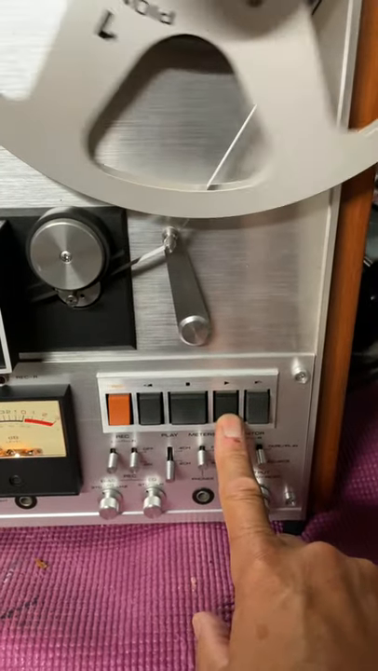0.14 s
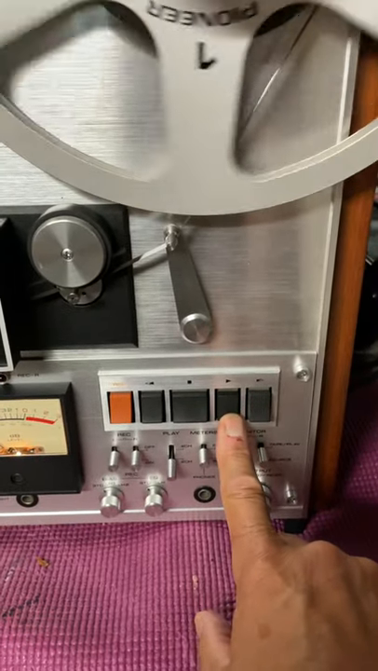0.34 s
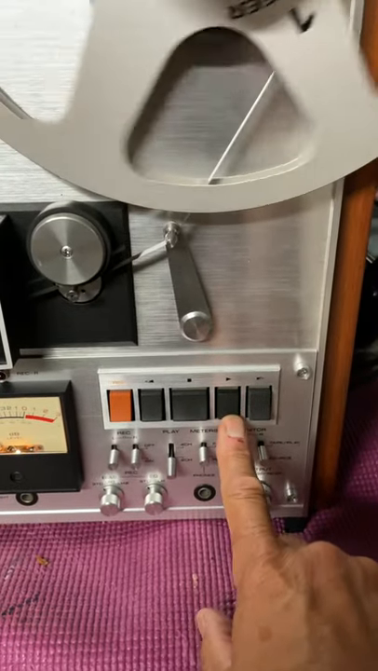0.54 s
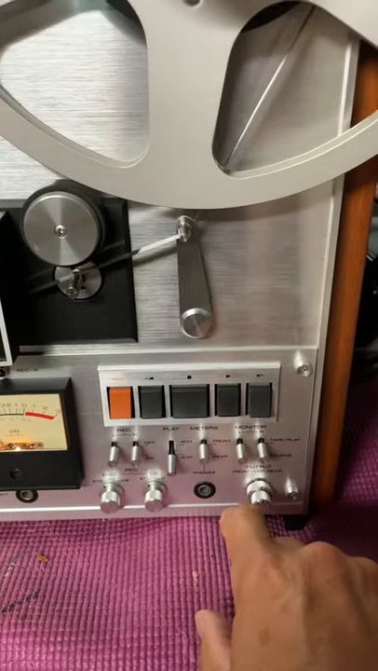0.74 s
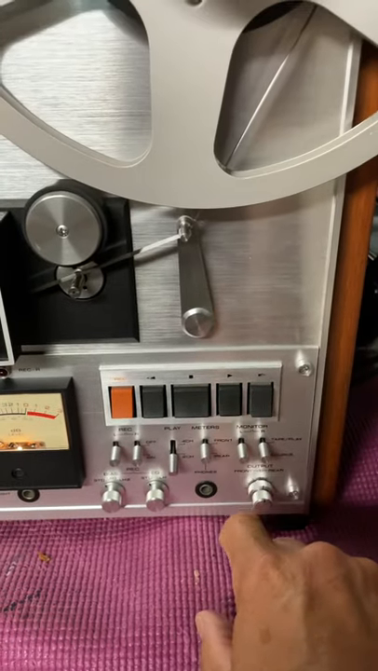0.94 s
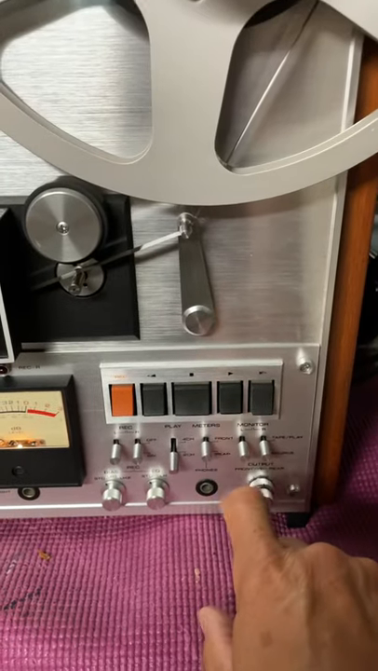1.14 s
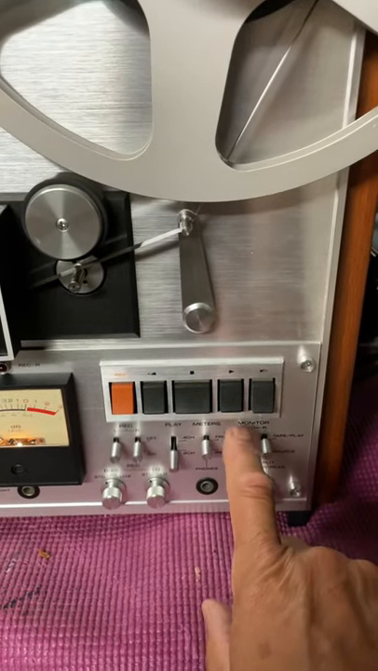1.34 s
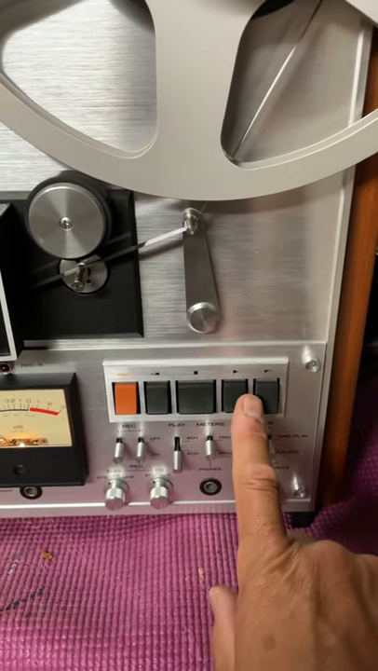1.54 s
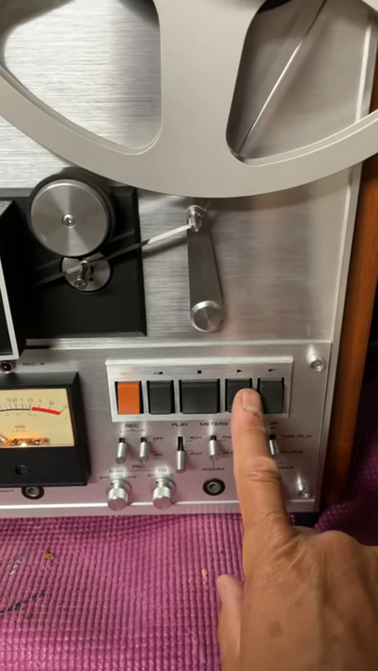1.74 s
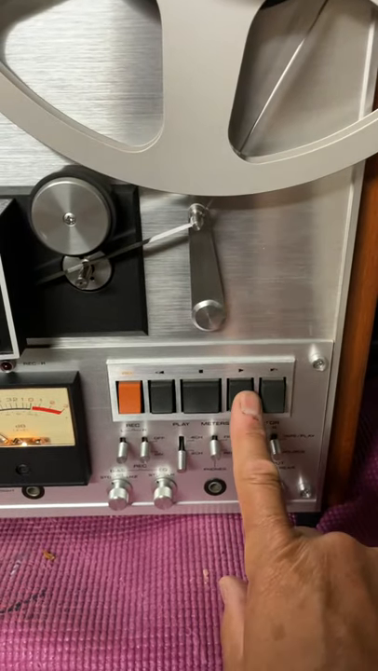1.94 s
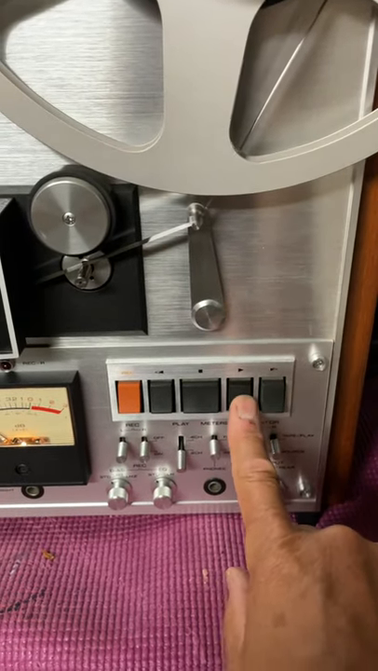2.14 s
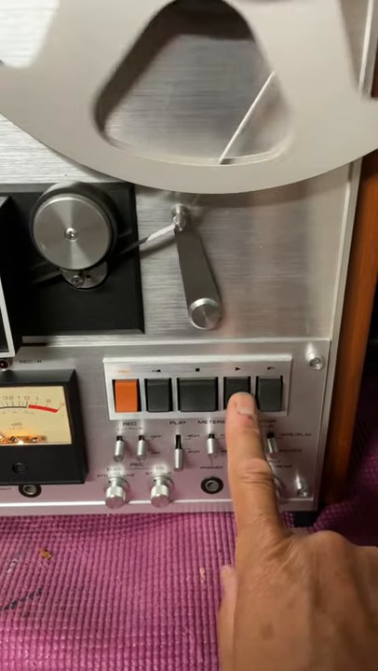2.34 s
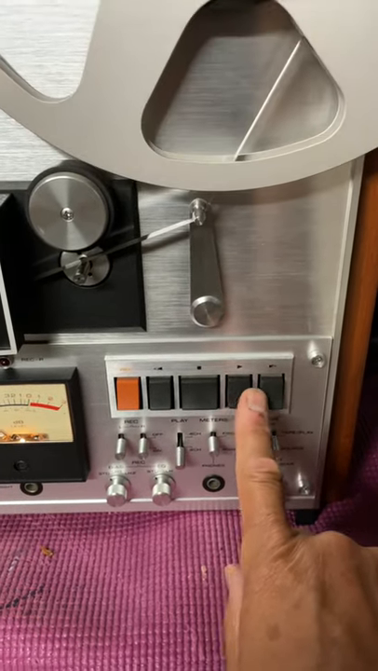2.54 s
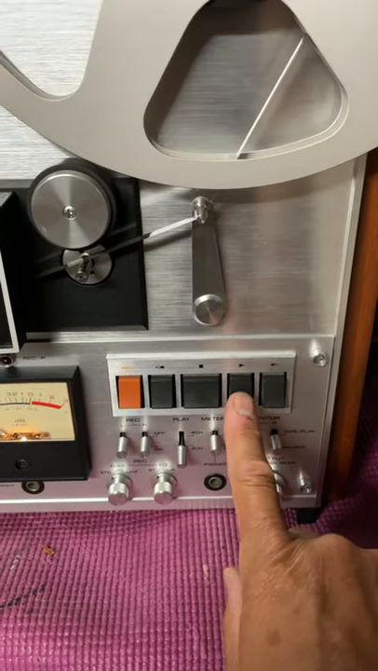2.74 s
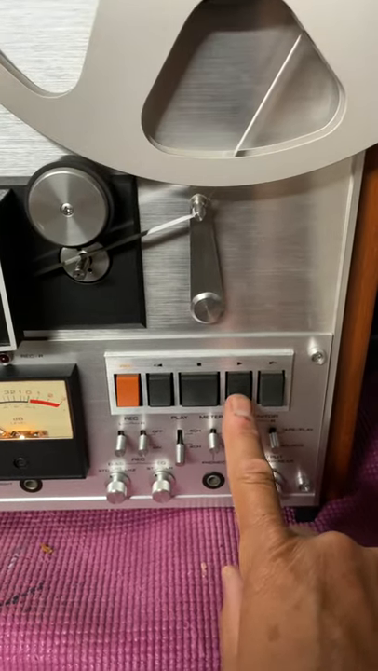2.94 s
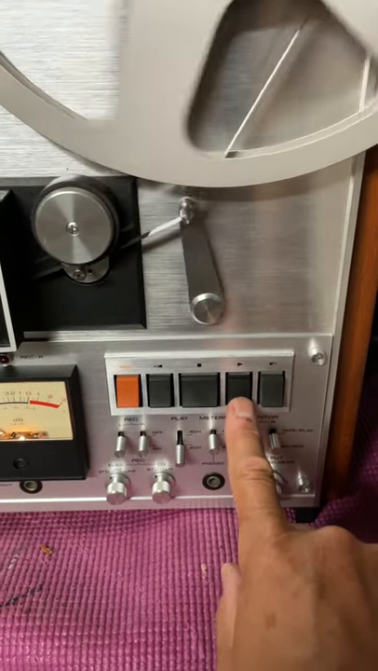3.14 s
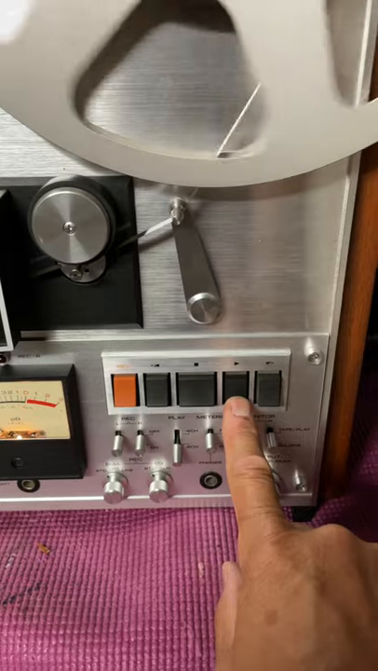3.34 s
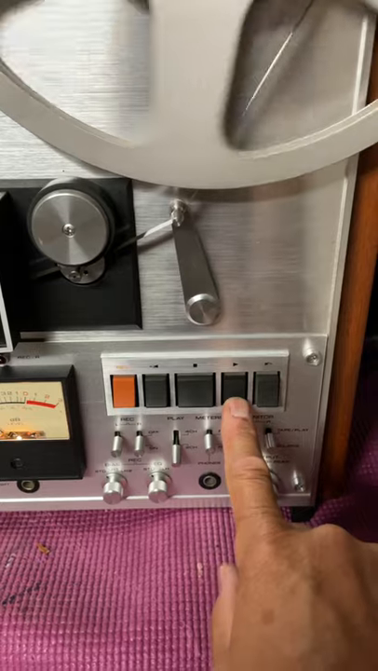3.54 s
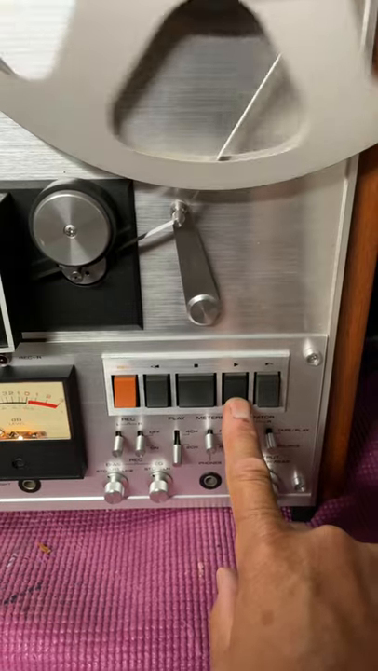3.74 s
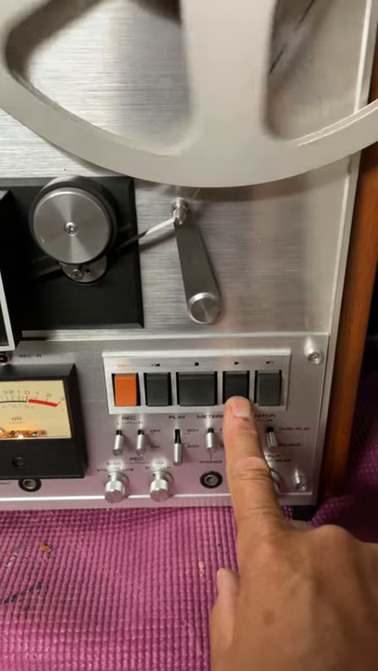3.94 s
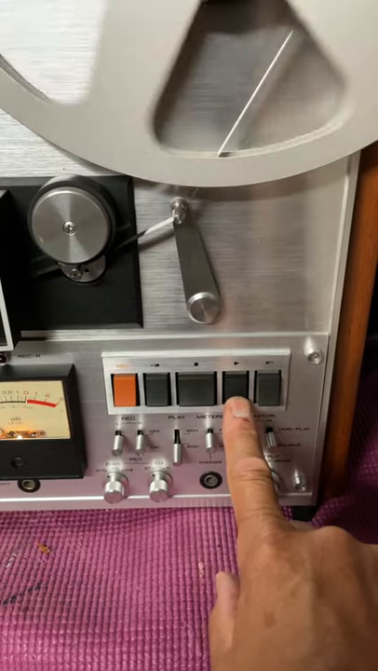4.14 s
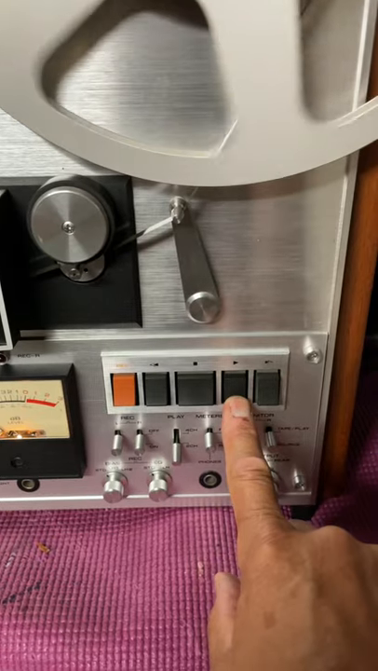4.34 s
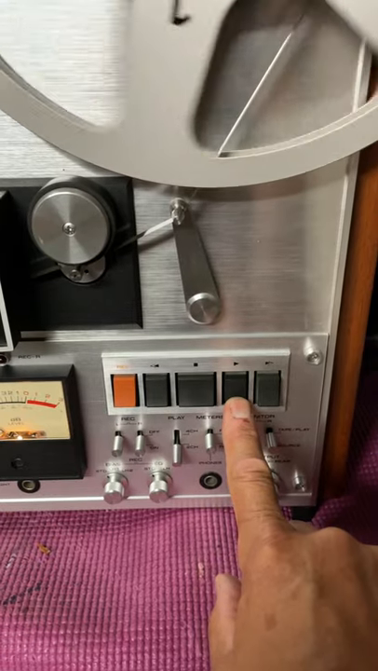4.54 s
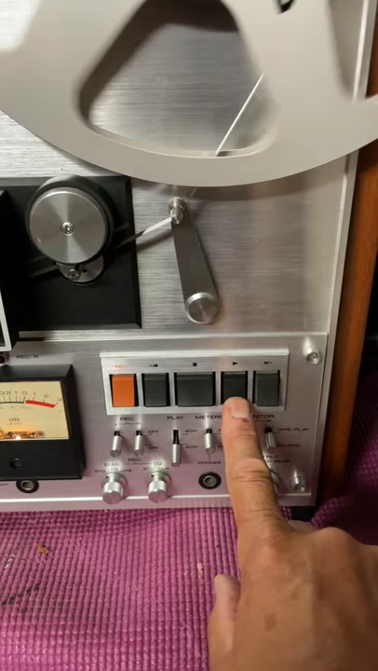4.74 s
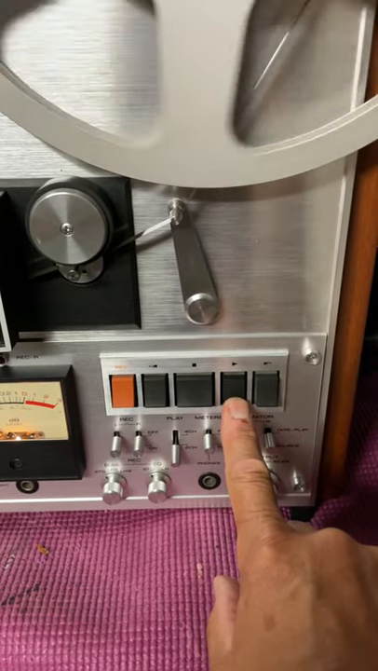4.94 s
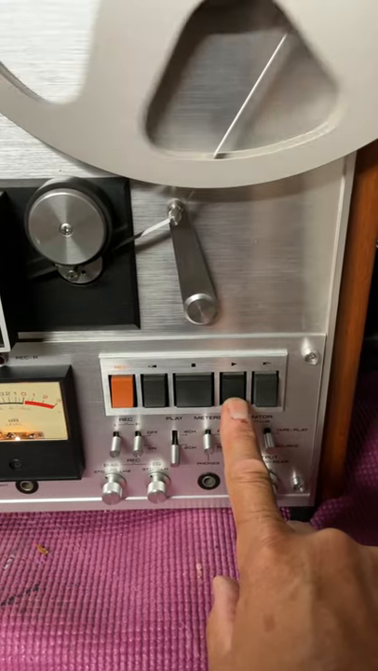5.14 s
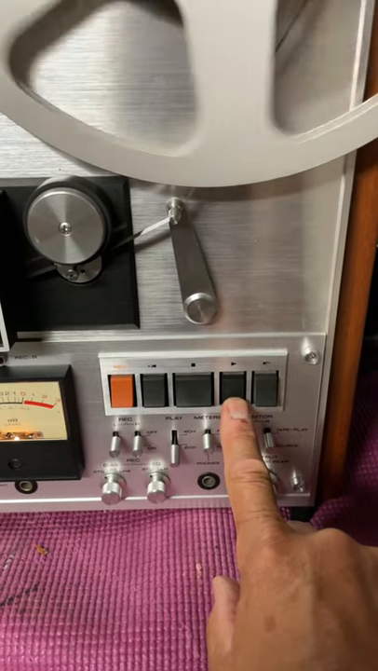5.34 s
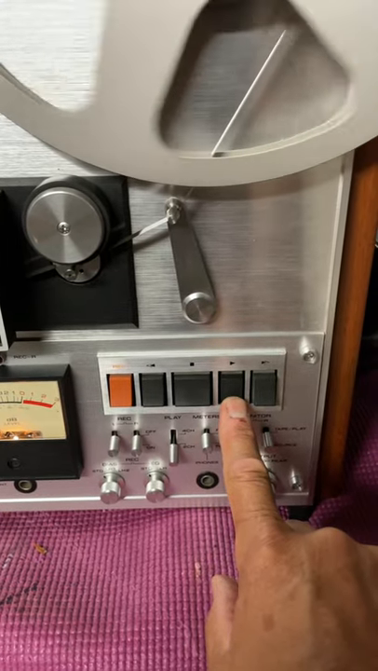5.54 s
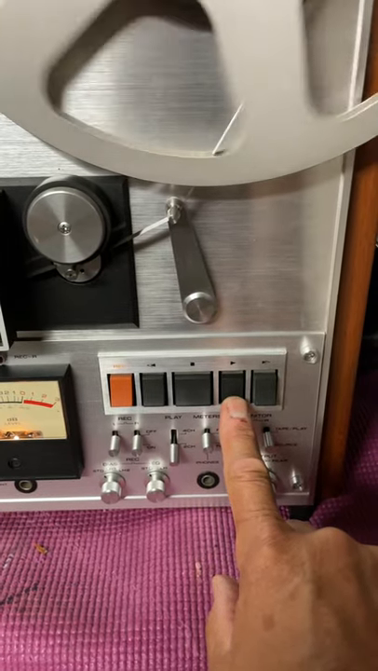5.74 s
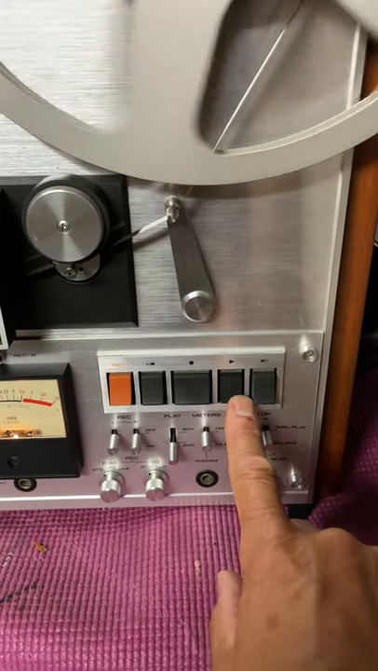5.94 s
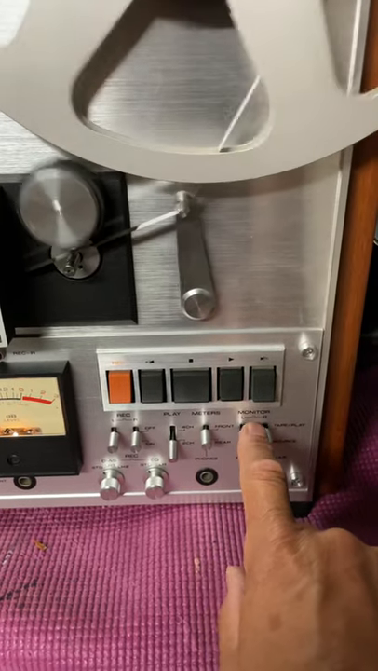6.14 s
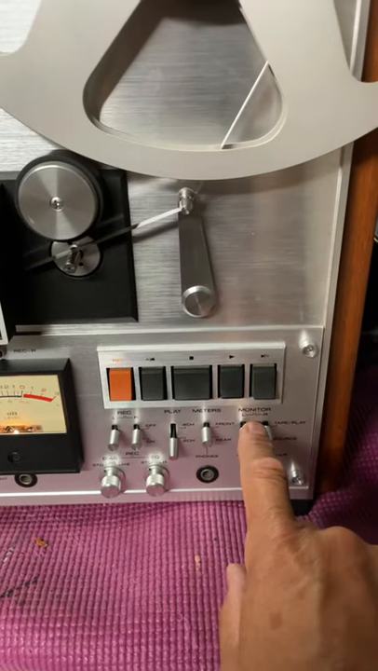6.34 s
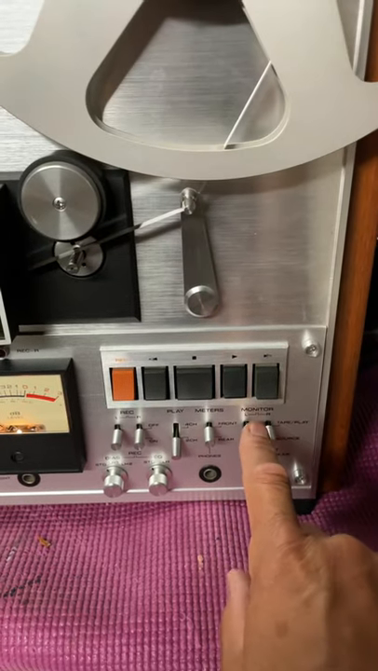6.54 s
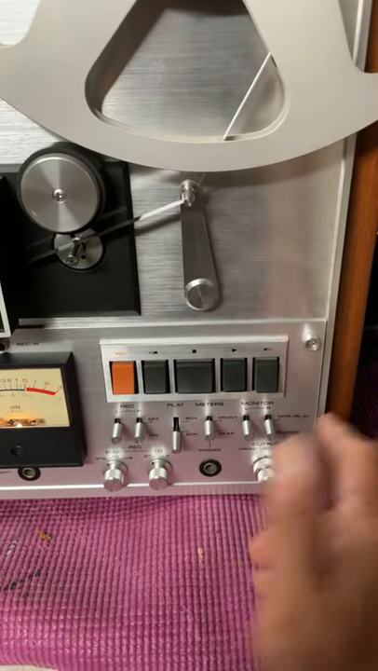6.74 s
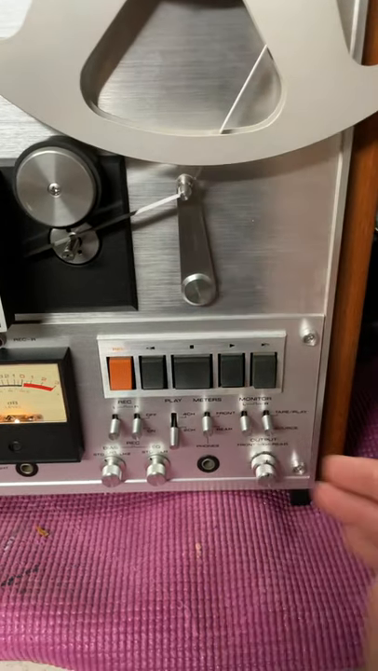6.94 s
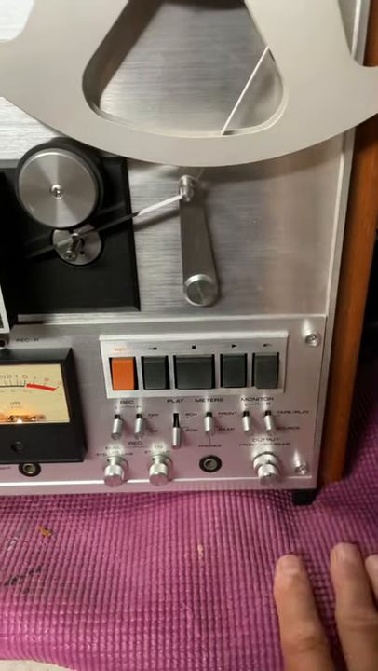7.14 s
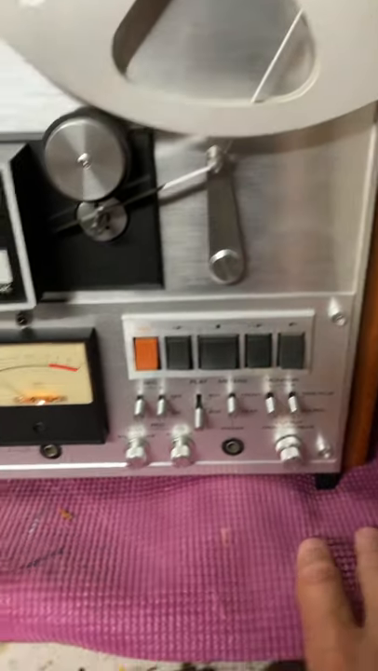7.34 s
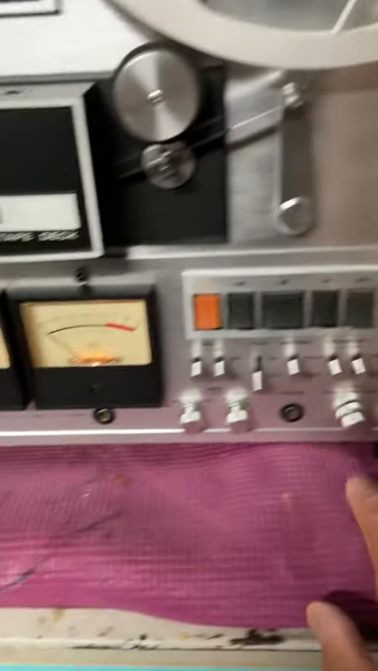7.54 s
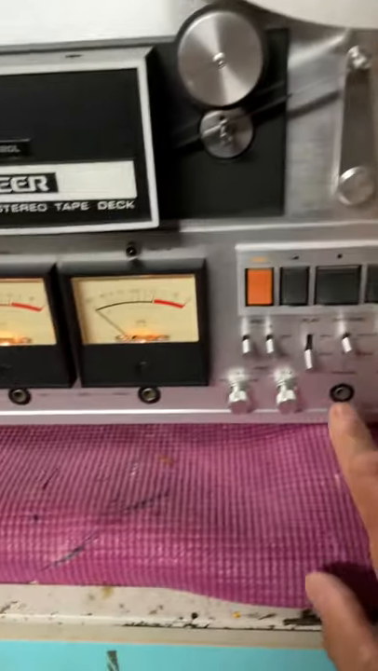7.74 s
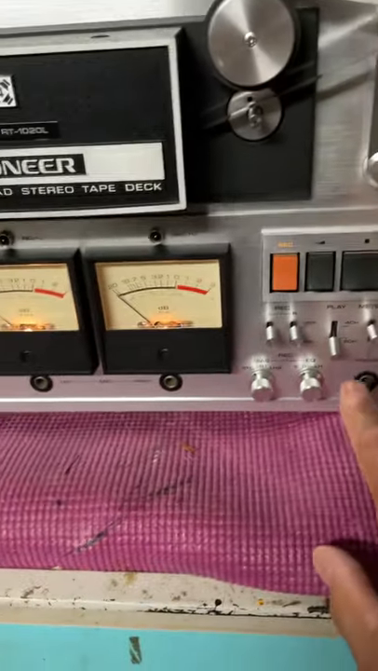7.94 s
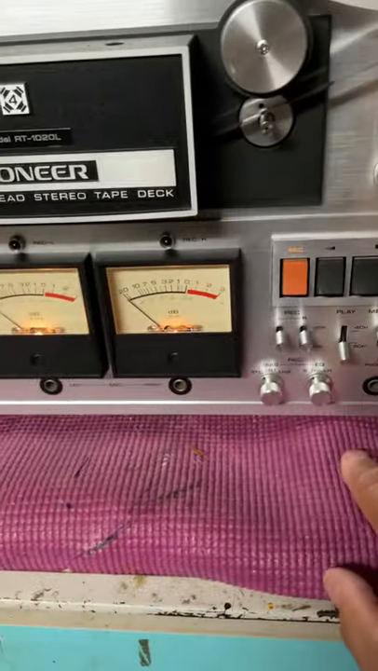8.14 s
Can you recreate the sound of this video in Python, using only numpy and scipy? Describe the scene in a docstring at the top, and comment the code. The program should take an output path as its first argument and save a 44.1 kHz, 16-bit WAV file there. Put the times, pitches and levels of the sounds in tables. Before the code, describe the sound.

Sharp mechanical clacks and springy clunks of a reel-to-reel deck's keys over steady humming motors, ending with a woody knock, cloth rubs and low thumps.

```python
"""Motor hum and tape hiss come first, then a light rub of fingers, then the keys of a reel-to-reel tape deck:
stop, play, stop, play, stop. Hum is wavering sines over rumble noise; hiss is steady, slightly louder while
the tape runs. Switches, brakes, pinch roller and arm are short contact forces played on resonant bodies;
levers scrape as gritty noise, panel and springs ring on as fading sines. At the end fingers knock on the wooden
cabinet, a hand strokes the table cloth (swells of noise) and bumps the table; low thumps are swinging sines."""
import sys
import numpy as np
from scipy import signal
from scipy.fft import rfft, irfft, next_fast_len
from scipy.io import wavfile
from scipy.ndimage import uniform_filter1d

SR = 44100
rng = np.random.default_rng(int(sys.argv[2]) if len(sys.argv) > 2 else 0)


def generate_wav(sig):
    """Save sig (samples, or channels by samples) to the path in sys.argv[1] as 16-bit PCM at SR."""
    pcm = np.round(np.clip(np.atleast_2d(sig).T, -1, 1) * 32767).astype(np.int16)
    wavfile.write(sys.argv[1], SR, pcm)


N = 365148
TIME = np.arange(N) / SR
TAIL = TIME[:SR // 2]   # the half second in which one blow rings out
SNAP_RATTLE_S = 0.0008

# the stop key is pressed: t/s, key travel/s, latch level/dB, switch level/dB, switch brightness f/Hz,
# sliding lever level/dB
STOP_PRESSES = [(0.5494, 0.0094, -27, -15, 12400, -40.5), (2.2869, 0.013, -39, -20.5, 6500, -36),
                (6.0060, 0.01, -29.5, -15, 12000, -37)]
# the play key is pressed and the pinch roller swings up: t/s, level/dB, travel/s
PLAY_PRESSES = [(2.0640, -19, .0692), (2.985, -20, .0695)]


def from_db(db):
    """Decibels to amplitude."""
    return np.exp(np.asarray(db) * (np.log(10) / 20))


def rms_one(x):
    """Scale a steady sound to rms 1."""
    return x / np.sqrt(np.mean(x ** 2) + 1e-20)


def blow_one(x):
    """Scale a ring to the energy of 5 ms at level 1."""
    energy = np.mean(np.sum(x ** 2, axis=-1))
    return x / np.sqrt(energy / (0.005 * SR))


def at_hz(points, hz):
    """Read a curve of (f/Hz, value) points along log frequency."""
    points = np.array(points)
    return np.interp(np.log(hz), np.log(points[:, 0]), points[:, 1])


def dying(t60):
    """Exponential decay by 60 dB in t60 seconds."""
    return np.exp(-np.log(1000) * TAIL / t60)


def add(out, s, sound):
    """Mix a sound in at a time."""
    start = int(round(s * SR))
    out[..., start:start + sound.shape[-1]] += sound[..., :N - start]


def drift(rate):
    """Random wandering through rate unit-spread values a second, straight between them."""
    knots = rng.standard_normal(800)
    return np.interp(TIME * rate, np.arange(len(knots)), knots)


def stereo(mid, side, hz):
    """Two unrelated noises become left and right, as alike as the curve says at each frequency."""
    # f/Hz, likeness of left and right (0-1)
    likeness = [(30, 1), (150, .999), (300, .994), (700, .93), (1700, .94), (3200, .72), (4800, .45),
                (6000, .8), (8000, .9), (10000, .999), (12500, .93), (15000, .97)]
    alike = np.clip(at_hz(likeness, hz), 0, 1)
    left_right = np.array([[1], [-1]])
    return np.sqrt(1 + alike) * mid + np.sqrt(1 - alike) * side * left_right


def noise_bands(size):
    """Third-octave bands of stereo noise: (centre Hz, noise)."""
    edges = 120 * 2 ** np.arange(0, 7.4, 1 / 3)
    hz = np.arange(1, size // 2 + 2) * SR / size
    white = stereo(*rfft(rng.standard_normal((2, size))), hz)
    bands = []
    for low, high in zip(edges, edges[1:]):
        inside = (hz >= low) & (hz < high)
        bands.append((np.sqrt(low * high), irfft(white * inside, size)))
    return bands


def coloured(spectrum):
    """Steady stereo noise with a spectrum of (f/Hz, dB per Hz); rms 1."""
    size = next_fast_len(N + SR // 10, real=True)
    hz = np.arange(size // 2 + 1) * SR / size + 1   # 1 Hz up, to keep the logarithm finite
    mid, side = rng.standard_normal((2, 2 * len(hz))).view(complex)
    shaped = stereo(mid, side, hz) * from_db(at_hz(spectrum, hz))
    return rms_one(irfft(shaped, size)[:, :N])


def body(modes, crowd, modes_db, room_db, damping, crack_db):
    """Answer of a part to one tap: the contact's crack, its main modes, a crowd of small ones, the room's tail."""
    # ring of the small modes before damping: f/Hz, t60/s
    crowd_t60 = [(200, 0.27), (700, 0.034), (2000, 0.11), (6000, 0.033), (14000, 0.048)]
    # ring of the room: f/Hz, t60/s
    room_t60 = [(200, 0.33), (700, .33), (1200, 0.14), (3000, 0.19), (6000, 0.17), (14000, 0.065)]
    pan_db = -0.9   # spread of the modes between left and right
    main = 0
    for k, (hz, width, db) in enumerate(modes):
        gain = (-1) ** k * from_db(db + pan_db * rng.standard_normal((2, 1)))
        main = main + gain * width * np.exp(-np.pi * width * TAIL) * np.sin(2 * np.pi * hz * TAIL)
    small = 0
    for hz, noise in noise_bands(size=len(TAIL)):
        room = from_db(room_db) * dying(at_hz(room_t60, hz))
        fade = dying(at_hz(crowd_t60, hz) / damping) + room
        # a band's energy grows with its width and with its ring time
        band_gain = from_db(at_hz(crowd, hz)) * np.sqrt(hz * np.sum(fade ** 2))
        small = small + band_gain * blow_one(noise * fade)
    crack_band = signal.butter(2, [6000, 15000], "band", fs=SR, output="sos")
    crack = signal.sosfilt(crack_band, (TAIL == 0) + 1e-18)
    return blow_one(blow_one(small) + from_db(modes_db) * blow_one(main) + from_db(crack_db) * blow_one(crack))


def contact(bright_hz, rattle_s, rattle_db):
    """One tap and a dying chatter of smaller ones, even in colour; softer contacts are duller."""
    t = TAIL[:2048]
    hits = rng.standard_normal(len(t)) * (rng.random(len(t)) < 2500 / SR)   # about 2500 a second
    chatter = hits * np.exp(-t / rattle_s)
    chatter = chatter / np.sqrt(np.sum(chatter ** 2) + 1e-12)
    force = from_db(rattle_db) * chatter + (t == 0)
    # level the broad colour, keep the fine structure
    spectrum = rfft(force, 2 * len(t))
    broad_power = uniform_filter1d(abs(spectrum) ** 2, size=24)
    force = irfft(spectrum / np.sqrt(broad_power))[:len(t)]
    soft = np.exp(-2 * np.pi * bright_hz / SR)
    return signal.lfilter([1 - soft], [1, -soft], force + 1e-18)


def strike(blows, answer, rattle_db):
    """Play blows (t/s, level/dB, brightness f/Hz, rattle/s) on one part by convolving force and answer."""
    force = np.zeros(N)
    for s, db, bright_hz, rattle_s in blows:
        add(force, s, from_db(db) * contact(bright_hz, rattle_s, rattle_db))
    return signal.oaconvolve(force[None], answer, axes=1)[:, :N]


def acting_on(part):
    """All that the keys do to one part: blows as in strike, slides (t/s, length/s, level/dB), jolts (t/s, level/dB)."""
    actions = (stop_key, brakes, roller_return, play_key)
    return [row for action in actions for name, row in action() if name == part]


def tape_speed():
    """The tape runs at first, halts at each stop key and starts at each play key; 0-1."""
    running = 1.0 + sum(TIME > s for s, *_ in PLAY_PRESSES) - sum(TIME > s for s, *_ in STOP_PRESSES)
    ramp_s = 0.15   # centred on the key
    return uniform_filter1d(running, size=int(ramp_s * SR))


def motors():
    """Slightly wavering hum lines over a rumble; a steady hiss is slightly louder while the tape runs."""
    # motors and transformer: f/Hz, level/dB rms before the waver
    hum_lines = [(120, -47), (178, -54.5), (208, -56.5), (258.5, -55.5), (360, -58.5), (877, -73.5),
                 (1163, -78), (4177, -87.5), (4587, -89.5)]
    # low rumble: f/Hz, relative level/dB per Hz
    rumble_spectrum = [(25, -11.5), (47, 1.5), (65, -1.5), (100, -2.5), (140, -9.5), (190, -5), (240, -10),
                       (300, -14), (400, -19.5), (480, -24), (1000, -31.5), (1500, -37), (2200, -44.5),
                       (5000, -79.5)]
    # hiss: f/Hz, relative level/dB per Hz
    hiss_spectrum = [(1500, -12), (2500, 3), (4300, -3), (6000, -5.5), (7300, -8.5), (8200, -1.5),
                     (10000, -8), (13000, -6), (15500, -22.5)]
    waver_db = drift(6.7)
    hum = 0
    for hz, db in hum_lines:
        phase = 2 * np.pi * hz * TIME + 0.15 * drift(5.1)
        hum = hum + from_db(db) * np.sqrt(2) * np.sin(phase)
    rumble = from_db(-42.0) * coloured(rumble_spectrum)
    hiss_level = from_db(-70.0) + from_db(-85.0) * tape_speed()
    return hum * from_db(waver_db) + rumble + hiss_level * coloured(hiss_spectrum)


def rubs():
    """Each rub is a brief, uneven swell of friction noise in one band."""
    # fingers rubbing lightly over deck and cloth: t/s, length/s, level/dB, centre f/Hz, width/octaves
    finger_rubs = [(0.281, 0.048, -56, 945, 1.35), (0.995, 0.079, -56.5, 1750, 0.67),
                   (1.158, 0.058, -63.5, 4460, 0.73), (1.315, 0.077, -57, 1180, 0.79),
                   (1.94, 0.03, -63, 3200, 0.88), (5.563, 0.012, -60, 3320, 0.67),
                   (7.203, 0.055, -65, 2190, 0.82), (7.401, 0.031, -63, 2200, 0.49),
                   (7.518, .12, -69, 6900, .3), (7.638, 0.15, -67.5, 6200, 0.3),
                   (7.661, 0.25, -72.5, 2400, 1.2), (7.882, 0.44, -74, 3870, 0.28),
                   (7.987, 0.17, -68.5, 2400, 1.3)]
    out = np.zeros((2, N))
    for s, length, db, hz, octaves in finger_rubs:
        edges = hz * 2 ** (octaves * np.array([-0.5, 0.5]))
        band = signal.butter(2, edges, "band", fs=SR, output="sos")
        friction = signal.sosfilt(band, rng.standard_normal(len(TAIL)))
        swell = np.interp(TAIL, [0, 0.27 * length, length], [0, 1, 0])
        add(out, s, from_db(db) * rms_one(friction) * swell)
    stick_slip_db = 3 * drift(45)
    return out * from_db(stick_slip_db)


def stop_key():
    """The latch lets go and a lever starts to slide; after the key's travel the switch snaps."""
    for s, travel_s, latch_db, db, hz, slide_db in STOP_PRESSES:
        yield "latch", (s - travel_s, latch_db, 4500, 0.003)
        yield "switch", (s, db, hz, SNAP_RATTLE_S)
        yield "slide", (s - travel_s, 0.12, slide_db)


def linkage():
    """Sliding levers give short gritty scrapes that rise fast and ease off."""
    # scrape: f/Hz, relative level/dB per Hz
    scrape_spectrum = [(300, 3.5), (1000, 6), (3000, -11), (6000, 0.5), (9000, 2), (13500, 3),
                       (16000, -12.5)]
    pressure = np.zeros(N)
    for s, length, db in acting_on("slide"):
        push = np.interp(TAIL / length, [0, 0.12, 0.45, 0.85, 1], [0.3, 1, 0.18, 0.32, 0.00086])
        add(pressure, s, from_db(db) * push)
    roughness = rms_one(uniform_filter1d(rng.standard_normal(N), size=30))
    grit = rms_one(from_db(1.8 * roughness))
    return pressure * grit * coloured(scrape_spectrum)


def switches():
    """Latch, key switch and roller's switch are small hard parts: bright modes, a dense crowd, a sharp crack."""
    # main modes of each part: f/Hz, width/Hz, relative level/dB
    latch_modes = [(2850, 130, -5), (3103, 240, -14.5), (4270, 81, 0), (5300, 82, 0.5), (5450, 150, -8)]
    switch_modes = [(2630, 76, -1), (3700, 200, -9.5), (4400, 100, -13), (5400, 110, -0.5), (5830, 990, 0),
                    (7175, 110, -7.5)]
    trip_modes = [(5730, 160, 1), (7400, 230, -4), (8600, 470, -8)]
    # small modes, the same for all three: f/Hz, relative level/dB per Hz
    switch_crowd = [(200, -28.5), (1500, -12), (2700, -3), (4500, -8.5), (6000, -3), (9000, 4), (12000, -4),
                    (15000, -6.5)]
    # stray ticks of the keys under the finger: t/s, level/dB, brightness f/Hz
    stray_ticks = [(1.168, -53, 4000), (2.329, -35, 9000), (3.153, -53, 5000), (3.381, -40, 1500),
                   (3.388, -38.5, 1200)]
    latch = body(latch_modes, switch_crowd, modes_db=8.0, room_db=-23.0, damping=3.1, crack_db=-17.0)
    switch = body(switch_modes, switch_crowd, modes_db=-3, room_db=-15.0, damping=0.91, crack_db=-7.0)
    trip = body(trip_modes, switch_crowd, modes_db=-1.5, room_db=-17, damping=2.9, crack_db=-3)
    snaps = acting_on("switch") + [(s, db, hz, SNAP_RATTLE_S) for s, db, hz in stray_ticks]
    out = strike(acting_on("latch"), latch, rattle_db=-0.5)
    out = out + strike(snaps, switch, rattle_db=-4.0)
    return out + strike(acting_on("trip"), trip, rattle_db=-5.5)


def brakes():
    """The brakes hit the chassis, rebound at once and settle with a dull rattle; hard when reels are at speed."""
    # brakes slamming on: t/s, level/dB, brightness f/Hz, settling level/dB
    brake_slams = [(0.5486, -7.5, 11900, -22), (2.2960, -23.5, 6000, -38), (6.0051, -8, 12000, -23)]
    rebound_s, rebound_loss_db, settle_s = 0.0019, 11.5, 0.016
    for s, db, hz, settle_db in brake_slams:
        yield "chassis", (s, db, hz, 0.003)
        yield "chassis", (s + rebound_s, db - rebound_loss_db, 0.29 * hz, 0.004)
        yield "chassis", (s + settle_s, settle_db, 3000, 0.008)
        yield "panel", (s, db - 11.0)
        yield "springs", (s, db - 13.5)


def chassis():
    """The chassis clacks under the brakes: many modes, a dense crowd and the room behind."""
    # main modes: f/Hz, width/Hz, relative level/dB
    chassis_modes = [(333, 24, 0.5), (592, 60, -4), (712, 31, -2), (1204, 36, -5), (1385, 57, -6.5),
                     (1545, 28, -5), (1837, 67, -3), (1960, 59, -5.5), (2210, 84, -8.5), (2500, 70, -8),
                     (2800, 18, -11.5), (3010, 50, -6), (3500, 40, -11), (3560, 90, -13), (3880, 40, -8),
                     (4000, 75, -1.5), (4450, 30, -14), (5500, 90, -9.5), (5390, 230, -10),
                     (5780, 65, -14.5), (6700, 79, -12), (6800, 55, -14), (9000, 150, -17)]
    # small modes: f/Hz, relative level/dB per Hz
    chassis_crowd = [(150, -16), (330, -9.5), (450, -13.5), (600, -1.5), (950, -2), (1600, -0.5),
                     (2400, -6), (3700, -2.5), (4700, -7), (5600, -6), (7300, -5), (10000, -2.5),
                     (13500, -10), (16000, -13.5)]
    answer = body(chassis_modes, chassis_crowd, modes_db=0.5, room_db=-6.0, damping=0.76, crack_db=-5)
    return strike(acting_on("chassis"), answer, rattle_db=-0.5)


def panel():
    """Each jolt rings front panel or springs, every mode with its own strength and a slightly shifted pitch."""
    # front panel ringing on: f/Hz, relative level/dB, t60/s
    panel_modes = [(353, -17, 0.3), (380, -14, 0.24), (572, -30, 0.42), (726, -29, 0.35), (770, -32, 0.3),
                   (937, -35, .3), (1370, -40, 0.3), (1660, -31.5, .16), (2060, -37, .2)]
    # return springs ringing on: f/Hz, relative level/dB, t60/s
    spring_modes = [(2460, -33, 0.32), (2493, -38, 0.24), (2690, -35, .2), (3020, -41, 0.18)]
    out = np.zeros(N)
    onset = 1 - np.exp(-TAIL / 0.008)
    for part, modes, detune in (("panel", panel_modes, 0.004), ("springs", spring_modes, 0.001)):
        for s, jolt_db in acting_on(part):
            ring = 0
            for hz, db, t60 in modes:
                strength = from_db(db + rng.normal(0, 1.9))
                shifted_hz = hz * (1 + detune * rng.normal())
                ring = ring + strength * dying(t60) * np.sin(2 * np.pi * (shifted_hz * TAIL + rng.random()))
            add(out, s, from_db(jolt_db) * ring * onset)
    return out


def roller_return():
    """The lever slides back with a knock; the roller trips a switch, hits its rest, twangs springs, bounces once."""
    # pinch roller falling back: t/s of its switch, fall/s, switch level/dB, clack level/dB,
    # sliding lever level/dB, lever's knock level/dB, panel jolt level/dB, bounce after/s, bounce loss/dB
    roller_falls = [(0.651, 0.03, -21.5, -21.5, -28.5, -30, -17.5, .0125, 14),
                    (2.3758, 0.027, -24, -20.5, -25, -34, -13.5, .0142, 4),
                    (6.1049, 0.027, -25, -21, -29, -35, -19, .0148, 5.5)]
    knock_lead_s, rest_lag_s = 0.0232, 0.0013   # timed from the roller's switch
    switch_extra_loss_db = 6   # the switch loses this much more on the bounce
    for s, fall_s, switch_db, db, slide_db, knock_db, jolt_db, bounce_s, loss_db in roller_falls:
        yield "slide", (s - fall_s, fall_s, slide_db)
        yield "rest", (s - knock_lead_s, knock_db, 2200, 0.004)
        yield "panel", (s - knock_lead_s, jolt_db)
        yield "trip", (s, switch_db, 11000, SNAP_RATTLE_S)
        yield "rest", (s + rest_lag_s, db, 3200, 0.0035)
        yield "panel", (s + rest_lag_s, db + 1.0)
        yield "springs", (s + rest_lag_s, db + 7.5)
        yield "trip", (s + bounce_s, switch_db - loss_db - switch_extra_loss_db, 10500, SNAP_RATTLE_S)
        yield "rest", (s + bounce_s, db - loss_db, 2400, 0.003)


def roller():
    """The roller's rest clacks; the pinch arm answers its own blows and loose levers knocking about."""
    # main modes of each part: f/Hz, width/Hz, relative level/dB
    rest_modes = [(376, 18, 3.5), (570, 76, -14), (900, 210, -8), (1170, 34, -3.5), (1370, 130, -12),
                  (1640, 51, 3), (2085, 52, -5.5), (2445, 21, -11), (2700, 38, -5.5), (3430, 60, -12),
                  (3700, 55, -23)]
    arm_modes = [(195.6, 20, -2), (371, 19, -3), (618, 50, -3.5), (786, 52, -9), (1160, 59, -10.5),
                 (1713, 58, -3.5), (1950, 46, -9.5), (2460, 117, -6), (2750, 60, -10), (3130, 97, -11.5),
                 (3550, 44, -9.5), (4070, 71, -13.5)]
    # small modes of each part: f/Hz, relative level/dB per Hz
    rest_crowd = [(150, -6.5), (450, -13.5), (800, -7), (1600, -7), (3000, -10), (4500, -19), (7000, -7),
                  (10000, -8.5), (15000, -11)]
    arm_crowd = [(130, -6), (220, -1), (450, -11), (620, 6), (850, 0.5), (1300, -9.5), (2400, -11),
                 (3500, -11.5), (5000, -17), (10000, -3.5), (15000, -10)]
    # loose levers knocking as the mechanism shifts: t/s, level/dB, brightness f/Hz, rattle/s
    lever_knocks = [(0.6276, -27, 2200, .001), (0.664, -30, 1500, .003), (0.694, -38, 1800, .002),
                    (2.3029, -28, 900, .004), (2.311, -25, 1500, 0.0053), (2.330, -27, 1000, .006),
                    (2.342, -30, 1800, .004), (2.3525, -29, 800, 0.005), (2.358, -24, 700, 0.0027),
                    (3.013, -26, 2000, 0.0018), (6.06, -31.5, 2500, .0015), (6.111, -30.5, 2500, .003)]
    rest = body(rest_modes, rest_crowd, modes_db=-1.0, room_db=1.5, damping=1.0, crack_db=-20)
    arm = body(arm_modes, arm_crowd, modes_db=-1.5, room_db=-2.0, damping=0.79, crack_db=-2.5)
    clacks = strike(acting_on("rest"), rest, rattle_db=-2.5)
    return clacks + strike(acting_on("arm") + lever_knocks, arm, rattle_db=1.0)


def play_key():
    """A light touch, then the key snaps; the arm scrapes upward, trips a second switch and lands on the capstan."""
    # the arm takes up its slack three times, lands twice and bounces:
    # t/s after the key, level/dB re the key, brightness f/Hz, rattle/s
    arm_stroke = [(0.0146, -6.5, 1195, 0.01), (.028, -1.5, 1700, 0.0013), (0.0349, 1.5, 2000, 0.0037),
                  (.0758, 4.5, 6000, 0.0035), (.0805, 0.2, 6000, .0045), (0.1183, -2, 1100, 0.0029)]
    touch_lead_s, touch_db = 0.0068, -19.5
    pull_lag_s = 0.0056   # the solenoid pulls just after the key
    for s, db, travel_s in PLAY_PRESSES:
        yield "switch", (s - touch_lead_s, db + touch_db, 4000, SNAP_RATTLE_S)
        yield "switch", (s, db, 5000, SNAP_RATTLE_S)
        yield "slide", (s + pull_lag_s, 2.0 * travel_s, db - 14.5)
        yield "trip", (s + travel_s, db + 1, 11500, SNAP_RATTLE_S)
        for lag_s, blow_db, hz, rattle_s in arm_stroke:
            yield "arm", (s + lag_s, db + blow_db, hz, rattle_s)
        for lag_s in (0.034, 0.14):   # as the slack is taken up, and again after the arm's bounce
            yield "panel", (s + lag_s, db - 2)
            yield "springs", (s + lag_s, db - 5.5)   # they ring less while the arm is pulled up


def cabinet():
    """Fingers give short woody knocks on the cabinet's modes."""
    # main modes: f/Hz, width/Hz, relative level/dB
    wood_modes = [(388, 100, -21), (648, 51, 6), (900, 66, -2), (1190, 90, -4), (1320, 80, -3),
                  (1570, 110, -1.5), (1706, 100, -2), (2066, 150, -4), (2550, 85, -2), (2880, 120, -12),
                  (3550, 144, -10), (4300, 250, -21)]
    # small modes: f/Hz, relative level/dB per Hz
    wood_crowd = [(200, 3), (450, -16), (700, -12), (1500, -13), (3000, -13.5), (4500, -18), (7000, -14),
                  (15000, -11)]
    # fingers knocking on the wood: t/s, level/dB, brightness f/Hz, rattle/s
    finger_knocks = [(6.5459, -44.5, 1960, .001), (7.0158, -41, 4010, 0.0029), (7.0198, -27, 1997, 0.0022),
                     (7.0228, -28, 1800, .0006), (7.0308, -20, 1800, .0015)]
    wood = body(wood_modes, wood_crowd, modes_db=-5.5, room_db=-10.5, damping=1.18, crack_db=-10.5)
    return strike(finger_knocks, wood, rattle_db=-4.0)


def cloth():
    """Each stroke of skin on cloth swells, holds unevenly and fades."""
    # the hand stroking the cloth: t/s, length/s, level/dB
    hand_strokes = [(6.564, .15, -60.5), (7.193, 0.035, -56), (7.385, 0.085, -64.5), (7.515, 0.17, -62.5),
                    (7.663, 0.14, -61), (7.76, 0.53, -68)]
    # skin on cloth: f/Hz, relative level/dB per Hz
    cloth_spectrum = [(500, 13), (1500, 7), (3000, 1.5), (6500, -2), (9000, -5), (13000, -3.5),
                      (16000, -14)]
    attack_s, release_s = 0.021, 0.023
    pressure = 0
    for s, length, db in hand_strokes:
        swell = np.clip((TIME - s) / attack_s, 0, 1)
        fade = np.exp(-np.maximum(TIME - s - length + release_s, 0) / release_s)
        pressure = pressure + from_db(db) * swell * fade
    return pressure * from_db(1.8 * drift(40)) * coloured(cloth_spectrum)


def low_thumps():
    """Table bumps and the boom of a finger knock are low sines that swell softly and die in a few cycles."""
    # the hand bumping the table near 64 Hz, and the finger knock's boom at 136-252 Hz:
    # t/s, level/dB, f/Hz, t60/s, contact/s
    thumps = [(6.667, -24, 63, 0.15, 0.0085), (7.026, -40, 252, 0.064, 0.0021),
              (7.0367, -21, 218, 0.081, 0.003), (7.039, -23, 136, .13, 0.0037),
              (7.207, -19, 63.9, 0.31, 0.0083), (7.768, -14, 65, 0.13, 0.01)]
    out = np.zeros(N)
    for s, db, hz, t60, contact_s in thumps:
        swell = 1 - np.exp(-(TAIL / contact_s) ** 2)
        swing = swell * dying(t60)
        add(out, s, from_db(db) * swing / swing.max() * np.sin(2 * np.pi * hz * TAIL))
    return out


def scene():
    """The deck's motors and keys, and the hand moving around it."""
    mechanism = linkage() + switches() + chassis() + panel() + roller()
    hand = rubs() + cabinet() + cloth() + low_thumps()
    return motors() + mechanism + hand


def record(dry):
    """The microphone's two ports hear the treble out of step; peaks are rounded, deepest bass and top are cut."""
    # phase by which the left microphone port leads the right: f/Hz, phase/rad
    port_lead = [(0, 0), (2000, .05), (4000, .5), (6000, .6), (8000, 2.1), (9100, 3.06), (11000, 3.22),
                 (12000, 4.1), (13000, 4.9), (14300, 6.2), (16000, 6.28)]
    size = next_fast_len(N + SR // 10)
    hz = np.arange(size // 2 + 1) * SR / size
    lead = np.interp(hz, *np.transpose(port_lead))
    shift = np.exp(0.5j * lead * np.array([[1], [-1]]))   # half the lead on each side
    ports = irfft(rfft(dry, size) * shift, size)[:, :N]
    ports = signal.sosfilt(signal.butter(4, 37, "high", fs=SR, output="sos"), ports)
    rounded = 0.9 * np.tanh(ports / 0.9)
    return signal.sosfilt(signal.ellip(10, 0.2, 90, 15900, fs=SR, output="sos"), rounded)


dry = scene()
out = record(dry)
generate_wav(out)
```